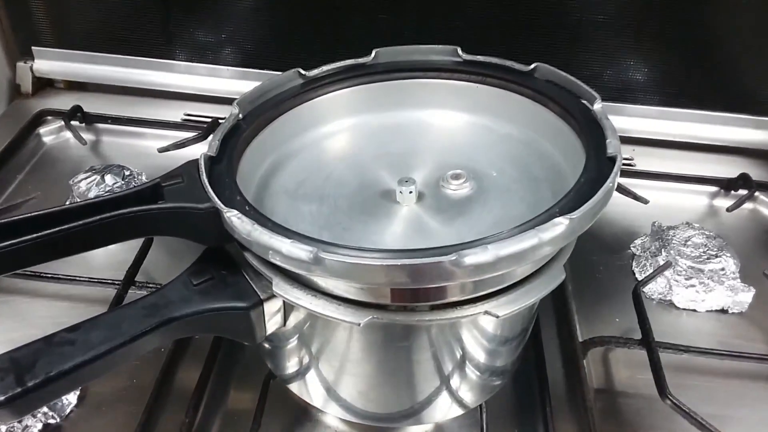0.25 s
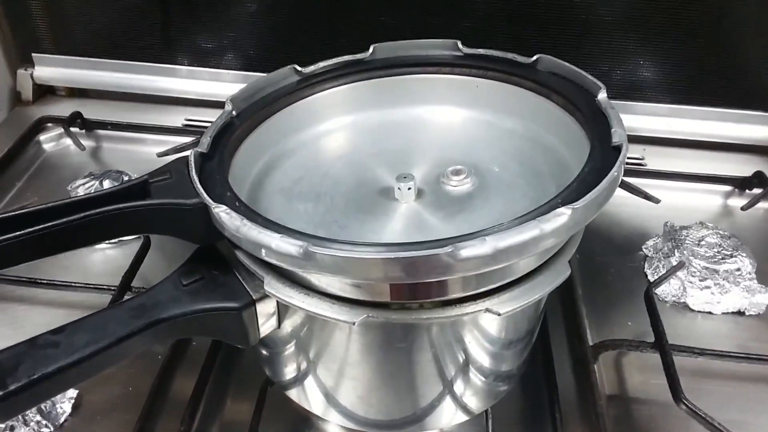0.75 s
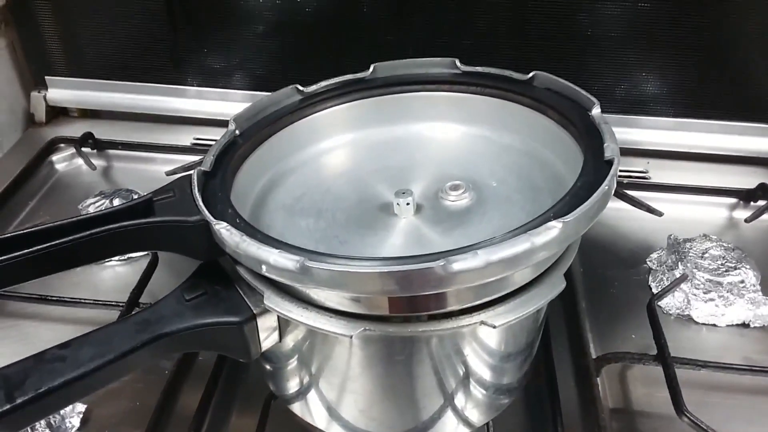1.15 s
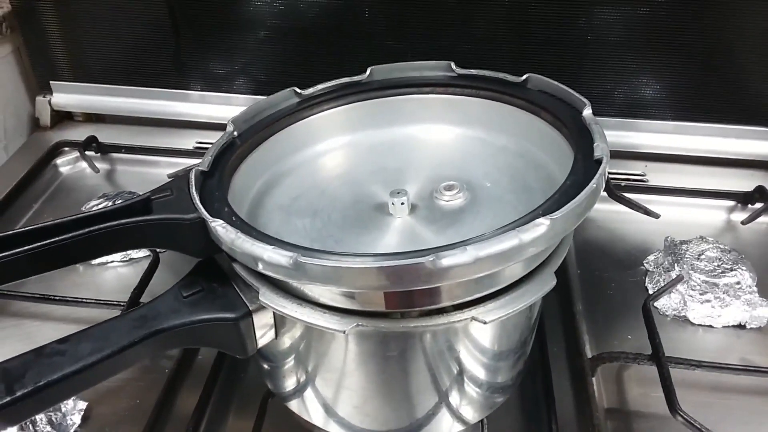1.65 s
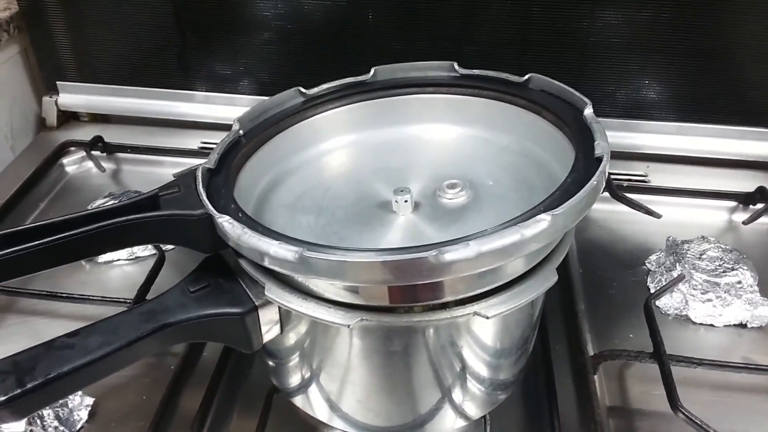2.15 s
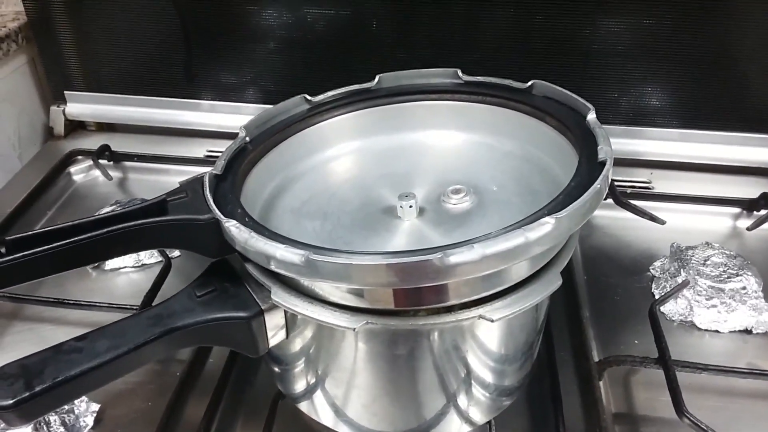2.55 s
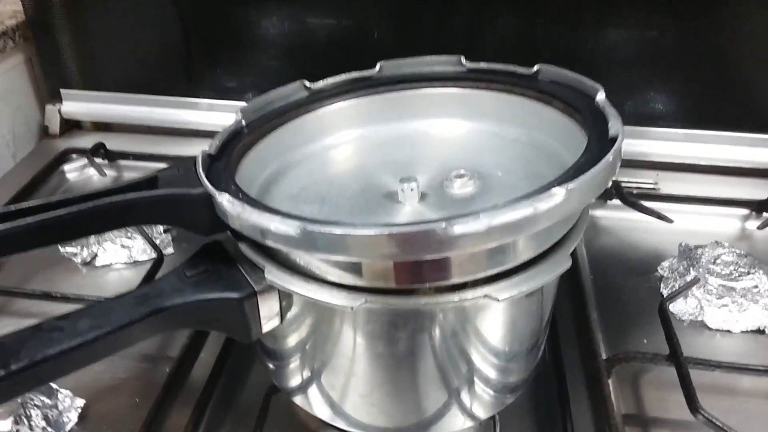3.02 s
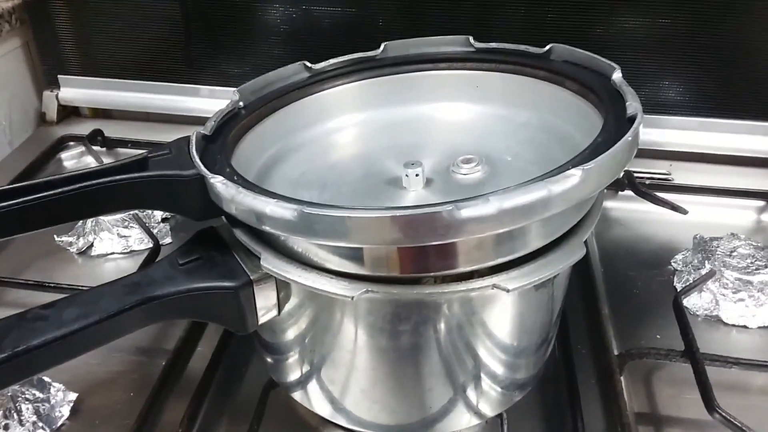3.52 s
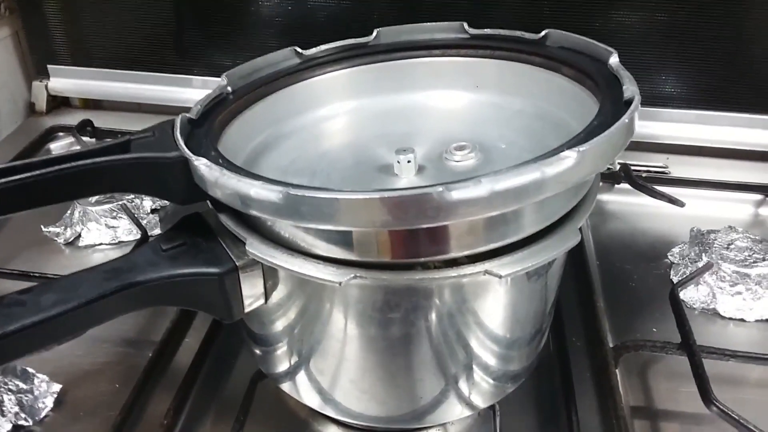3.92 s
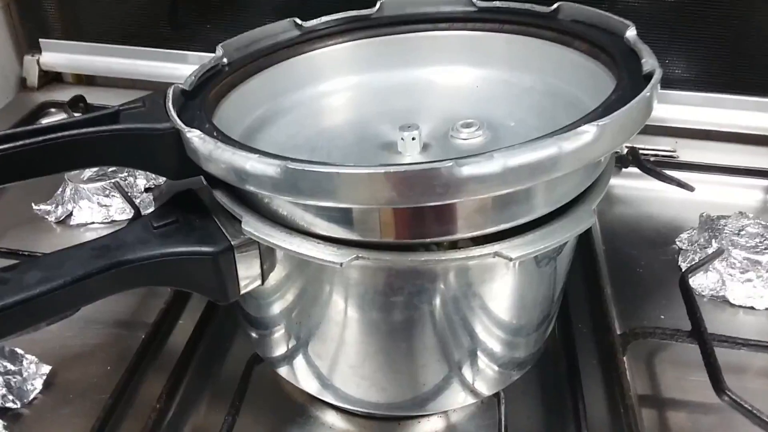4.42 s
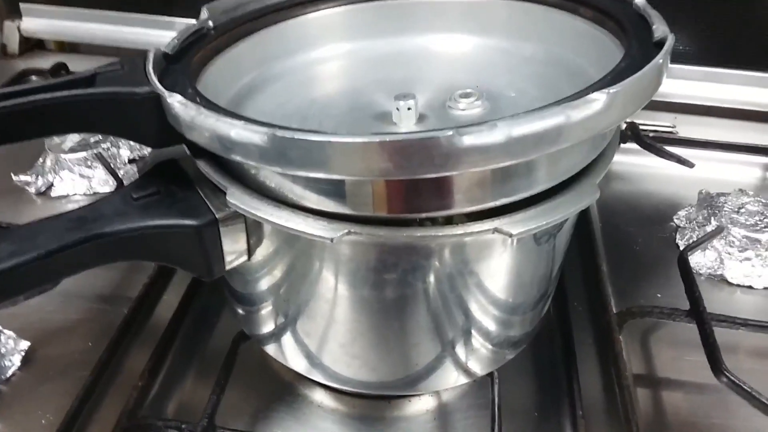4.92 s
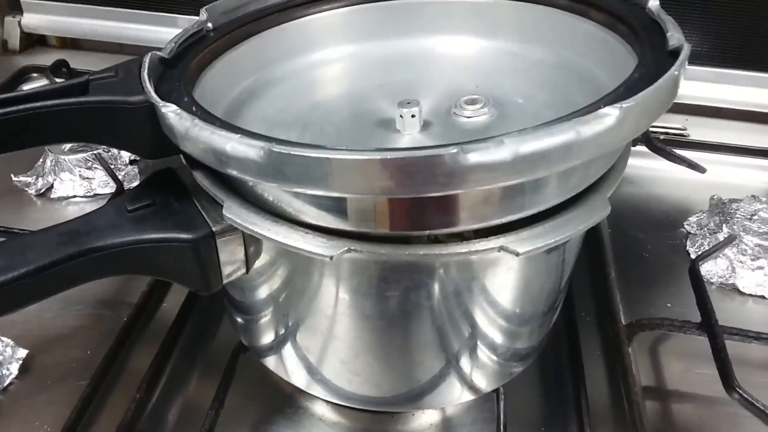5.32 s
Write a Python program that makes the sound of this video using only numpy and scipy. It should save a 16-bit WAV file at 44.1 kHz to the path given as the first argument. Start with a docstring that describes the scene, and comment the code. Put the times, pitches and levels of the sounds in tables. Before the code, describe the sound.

A small close microphone hears kernels bursting in a metal pot: a boomy thump of enclosed air, a clanky lid or rim and a bright spit each time. Early bursts are scattered, with quiet gaps around one second; stronger ones follow, with small rattles and sharp droplet snaps, ending in a dense flurry. Quiet gas burner rumble and wavering sizzle run throughout, with a short kitchen echo.

```python
"""Popcorn bursts in a lidded metal pot over a gas flame, heard from close by in a small kitchen.
The burner's low roar and the oil's hiss run throughout; from the start, bursting hulls thump the air in the pot,
knock the lid, ring base, rim and wall and spit steam. Loose kernels soon tumble and flying ones strike bare metal;
later, droplets snap on it, and the blows crowd together towards the end.
Modes ring as decaying sines, spits and hisses are coloured noise; hard walls give blows and snaps a short tail."""
import sys
import numpy as np
from scipy import signal
from scipy.fft import rfft, irfft, next_fast_len
from scipy.io import wavfile
from scipy.ndimage import map_coordinates

SR = 44100
rng = np.random.default_rng(int(sys.argv[2]) if len(sys.argv) > 2 else 0)


def to_wav(sig):
    """Store sig (one row per channel, or 1-D mono) as 16-bit WAV at the path in sys.argv[1].

    Samples outside -1..1 are clipped; the rate is SR.
    """
    pcm = np.clip(np.atleast_2d(sig), -1, 1) * 32767
    pcm = np.round(pcm).astype(np.int16)
    wavfile.write(sys.argv[1], SR, pcm.T)  # frames by channels


N = 245456  # length in samples

# relative colour of spitting steam and droplets: pitch_hz [Hz], density_db [dB per Hz]
SPIT_COLOUR = [(120, -120), (300, -31.5), (900, -19.5), (2500, -1.5), (5000, -0.5), (6500, -1), (8000, 6.5),
               (9500, -3), (13000, -6.5), (16000, -18.5)]


def amp(db):
    """Gain of a level in dB."""
    return 10 ** (np.asarray(db) / 20)


def unit(x):
    """x scaled to rms 1."""
    return x / np.sqrt(np.mean(x ** 2) + 1e-20)


def along(points, hz):
    """Read a curve of (Hz, value) points on a log frequency axis."""
    f, value = np.transpose(points)
    return np.interp(np.log(hz + 1), np.log(f + 1), value)


def wobble(rate):
    """A smooth random curve with rate knots a second."""
    knots = rng.standard_normal(int(N * rate / SR) + 4)
    return map_coordinates(knots, [np.arange(N) * rate / SR])


def hiss(colour, size, tilt_db=0):
    """Turbulent noise of rms 1 with the given colour, its highs tilted by about tilt_db an octave."""
    hz = np.fft.rfftfreq(size, 1 / SR)
    tilt = tilt_db * np.log2(hz / 6000 + 0.24)  # the offset levels the tilt out in the bass
    spectrum = rfft(rng.standard_normal(size)) * amp(along(colour, hz) + tilt)
    return unit(irfft(spectrum, size))


def add_at(out, start_s, sound):
    """Mix a sound into out from its start time."""
    start = round(start_s * SR)
    out[start:start + len(sound)] += sound


def pops():
    """Bursts thump and spit into a damped pot; strikes by flying kernels ring it longer."""
    # hulls bursting in the oil: start_s [s], thump_db, lid_db, rim_db, spit_db [dB],
    # spit_tilt_db [dB/octave]
    hull_bursts = [(0.0211, -40, -37, -40, -34, -5.5), (0.129, -59, -74, -66, -51.5, 8),
                   (0.4947, -54, -38, -43, -28, -5), (0.499, -43, -28.5, -33, -17.5, 11),
                   (0.5278, -30.5, -29, -33, -28, -7), (0.5604, -44, -35, -41, -29.5, -2),
                   (0.6962, -45, -53, -61, -59, 8), (0.7835, -32.5, -28, -37, -39, 7),
                   (0.7882, -60, -25, -35.5, -23, 2), (0.7918, -47, -33, -33, -18, 2.5),
                   (0.8187, -52, -53, -39, -31.5, 0), (1.1952, -41, -36.5, -43.5, -40.5, -23),
                   (1.263, -46, -43, -46, -39.5, -3), (1.3226, -52, -46, -46, -36.5, 5.5),
                   (1.5333, -33.5, -36.5, -45, -37.5, 5), (1.7647, -35, -30.5, -31.5, -21.5, -7.5),
                   (1.8531, -25, -33.5, -49, -21, 4.5), (2.3844, -26, -33, -35, -31, 5),
                   (2.388, -41, -30.5, -32.5, -18, 6.5), (2.6519, -41, -45, -53, -62, -4),
                   (2.6807, -49, -48, -51, -34, 4), (2.6895, -29, -33.5, -34, -23, -6),
                   (3.03, -48, -64, -48, -34.5, 15), (3.0389, -44, -56, -54, -36, -3.5),
                   (3.1222, -24.5, -34.5, -36.5, -22, 3), (3.3614, -55, -66, -61, -48.5, 11),
                   (3.575, -48, -46, -40.5, -37.5, -10.5), (3.6908, -39.5, -39, -44, -28, -4),
                   (3.842, -37, -30.5, -27, -22.5, -0.5), (3.8731, -56, -43, -38, -27.5, 6.5),
                   (3.8772, -25.5, -29, -29.5, -21, -6.5), (3.99, -18.5, -30, -36.5, -24.5, 2.5),
                   (4.3236, -45, -62, -66, -54.5, -8), (4.5571, -25.5, -30.5, -29, -22, 1),
                   (4.6526, -30.5, -25, -30, -36, 6), (4.8943, -39.5, -38.5, -41, -37, 9),
                   (4.9074, -35, -28, -35, -21, -0.5), (4.9827, -42, -51, -58, -83, -2),
                   (5.0518, -47, -40.5, -46, -42.5, 6), (5.1901, -33, -23, -27, -23.5, -9.5),
                   (5.2021, -28.5, -23.5, -26.5, -24, 0), (5.232, -30.5, -25.5, -31, -33.5, 16),
                   (5.301, -60, -40, -57, -36.5, 1), (5.3407, -24.5, -26.5, -28, -15.5, 3),
                   (5.439, -31.5, -43, -47, -30, 0)]
    # flying kernels striking bare metal: start_s [s], lid_db, base_db, rim_db, wall_db [dB],
    # wall_tilt_db [dB/octave], spit_db [dB]
    kernel_strikes = [(0.5045, -38, -54, -30, -35.5, 15, -43), (0.5424, -66, -40.5, -33, -34, 14, -32),
                      (1.1681, -56.5, -69, -52.5, -59, -18, -72), (1.5655, -38, -45, -49, -58, 7, -35),
                      (1.5812, -45, -33, -26, -30, 0, -41), (1.8829, -56, -31, -24, -22, -11, -35),
                      (1.9686, -53, -44, -35, -35.5, 6, -38), (1.9939, -45, -49, -40, -42, 2, -60),
                      (2.717, -63, -49, -33.5, -39.5, 12, -44), (3.0178, -64, -62, -49, -51, 2, -43),
                      (3.1578, -37, -34, -32, -51, -8, -33), (3.675, -60, -57, -47, -48.5, -4, -56),
                      (3.9197, -45, -36.5, -61, -58, 0, -63), (4.0386, -51, -45, -38.5, -39, -5, -33),
                      (4.246, -56, -61, -58, -60, -14, -74), (4.603, -47, -26.5, -24.5, -33.5, -1, -39),
                      (4.9224, -45, -55, -33.5, -49, -14, -52), (4.9455, -35, -35, -39, -44, -17, -43),
                      (5.3632, -38, -34.5, -29, -36, -17, -30.5), (5.4687, -58, -56, -44, -33, -19, -27.5),
                      (5.4899, -42, -44, -33.5, -33, 15, -31)]
    out = np.zeros(N + SR)
    t = np.arange(12288) / SR
    for start_s, thump_db, lid_db, rim_db, spit_db, spit_tilt_db in hull_bursts:
        base_db, wall_db = rim_db - 17.5, rim_db - 8.5
        add_at(out, start_s, blow(t, thump_db, lid_db, base_db, rim_db, wall_db, spit_db,
                                  wall_tilt_db=-3.5, spit_tilt_db=spit_tilt_db,
                                  spray_t60_s=0.067, sustain=0.54))
    for start_s, lid_db, base_db, rim_db, wall_db, wall_tilt_db, spit_db in kernel_strikes:
        thump_db = lid_db - 3.5
        add_at(out, start_s, blow(t, thump_db, lid_db, base_db, rim_db, wall_db, spit_db,
                                  wall_tilt_db=wall_tilt_db, spit_tilt_db=-1.5,
                                  spray_t60_s=0.093, sustain=0.71))
    return out[:N]


def blow(t, thump_db, lid_db, base_db, rim_db, wall_db, spit_db,
         wall_tilt_db, spit_tilt_db, spray_t60_s, sustain):
    """One blow excites air and metal at its own strengths; sustain scales the ring times of the metal."""
    # modes of the pot's lid, base, rim and wall: pitch_hz [Hz], relative level_db [dB],
    # t60_s [s, before sustain]
    lid_modes = [(1010, -33, 0.071), (1178.6, 19, 0.13), (1246, -7, 0.17), (1226, -49, 0.043),
                 (3375, 5.5, 0.029), (5940, 0.5, 0.075)]
    base_modes = [(888, -16.5, 0.16), (1383, -7, 0.29), (1430, -3.5, 0.073)]
    rim_modes = [(1947, -12, 0.28), (2000.4, 5, 0.14), (2021, 5.5, 0.098), (2280, -2, 0.14),
                 (2610, -15, 0.092), (2714, -9.5, 0.19)]
    wall_modes = [(2858, 1, 0.14), (3220, -11, 0.21), (3900, 7.5, 0.069), (4087, -9.5, 0.15),
                  (4410, -10.5, 0.23), (4710, -20.5, 0.59), (5570, -1.5, 0.057), (6480, -14.5, 0.41),
                  (7950, -6, 0.067)]
    metal_and_spit = amp(spit_db) * spit(t, spit_tilt_db, spray_t60_s)
    metal_and_spit += amp(lid_db) * ring(lid_modes, t, attack_s=0.00051, split=0.016,
                                         sustain=1.45 * sustain, early_db=17, early_share=0.35)
    metal_and_spit += amp(base_db) * ring(base_modes, t, attack_s=0.00051, split=0.003, sustain=sustain)
    metal_and_spit += amp(rim_db) * ring(rim_modes, t, attack_s=0.00054, split=0.0077, sustain=sustain)
    metal_and_spit += amp(wall_db) * ring(wall_modes, t, attack_s=0.00015, split=0.007,
                                          sustain=sustain, tilt_db=wall_tilt_db)
    air = amp(thump_db) * thump(t)
    tail = kitchen(amp(-5.0) * metal_and_spit + amp(-9.5) * air)
    return metal_and_spit + air + tail


def thump(t):
    """The air in the pot booms on its modes, with one short puff of pressure that lifts the lid."""
    # modes of the air in the pot: pitch_hz [Hz], relative level_db [dB], t60_s [s]
    air_modes = [(122.5, -8, 0.24), (249.3, 6, 0.083), (269, 4, 0.13), (288, -42, 0.11), (448, -5.5, 0.044)]
    boom = ring(air_modes, t, attack_s=0.0076, split=0.034, early_db=11, early_share=0.42)
    u = t / 0.0017  # time in puff lengths of 1.7 ms
    puff = u * (2 - u) * np.exp(1 - u)
    return boom + amp(-17.5) * puff


def spit(t, tilt_db, spray_t60_s):
    """A sharp crack, then steam and droplets that land unevenly."""
    steps_db = 3.53 * np.repeat(rng.standard_normal(len(t) // 64), 64)
    crack = amp(-2.5 - 60 * t / 0.0057)
    spray = amp(-0.03 - 60 * t / spray_t60_s)
    onset = 1 - np.exp(-t / 0.00061)
    return (crack + spray) * amp(steps_db) * onset * hiss(SPIT_COLOUR, len(t), tilt_db)


def ring(modes, t, attack_s, split, sustain=1, tilt_db=0, early_db=6, early_share=0.45):
    """One blow on a set of modes, rms 1 over its first 20 ms; a harder contact favours the upper ones."""
    hz, level_db, t60_s = np.repeat(np.transpose(modes), 3, axis=1)[:, :, None]
    # three close, randomly detuned partners make each mode beat roughly
    hz = hz * (1 + split * rng.standard_normal(hz.shape))
    level_db = level_db + tilt_db * np.log2(hz / hz[0])
    level_db = level_db + 2.5 * rng.standard_normal(hz.shape)  # random level spread of each partial
    t60_s = t60_s * sustain
    # each partial starts at a slightly random phase
    shift_s = 0.0002946 * rng.standard_normal(hz.shape)
    # each ring falls fast at first, then more slowly
    early = amp(early_db - 60 * t / (early_share * t60_s))
    late = amp(-60 * t / t60_s)
    swings = amp(level_db) * (early + late) * np.sin(2 * np.pi * hz * (t + shift_s))
    x = np.sum(swings, axis=0) * (1 - np.exp(-t / attack_s))
    return x / np.sqrt(np.mean(x[:SR // 50] ** 2))


def kitchen(x):
    """The walls' answer to one sound: a noise tail in which each frequency dies at its own speed."""
    # decay of the room: pitch_hz [Hz], t60_s [s]
    room_decay = [(150, 0.48), (700, 0.17), (2000, 0.38), (5000, 0.29), (13000, 0.24)]
    hz, t, z = signal.stft(rng.standard_normal(len(x)), SR, nperseg=256)
    fade = amp(-60 * t / along(room_decay, hz)[:, None])
    tail = signal.istft(z * fade, SR, nperseg=256)[1]
    delayed = np.pad(x, (130, 0))  # about 3 ms to the walls and back
    return signal.fftconvolve(delayed, tail / np.linalg.norm(tail))[:len(x)]


def snaps():
    """Droplets snap on hot metal: each is a very short spit of noise with the walls' answer."""
    # droplets: start_s [s], level_db [dB at the onset, before the walls' answer], tilt_db [dB/octave]
    droplets = [(1.1049, -46, 14), (1.2136, -39, 11), (2.7183, -16.5, 12), (3.477, -46, 13),
                (3.5513, -49, 8), (3.8554, -19, 5), (4.5714, -29, 8), (4.726, -41, 4), (4.9174, -17.5, 11),
                (4.9568, -24, 13), (5.249, -26, 12), (5.4444, -23, 10)]
    out = np.zeros(N + SR)
    t = np.arange(8192) / SR
    for start_s, level_db, tilt_db in droplets:
        snap = amp(level_db - 60 * t / 0.011) * hiss(SPIT_COLOUR, len(t), tilt_db)  # t60 of 11 ms
        add_at(out, start_s, snap + kitchen(amp(-6.5) * snap))
    return out[:N]


def tumbles(knocks_per_s=450):
    """Loose kernels tumble on the heap: runs of soft little knocks, some cycles long, at scattered pitch."""
    # runs: start_s [s], length_s [s], level_db [dB, before the spread of the knocks],
    # pitch_hz [Hz, centre of the scatter]
    kernel_runs = [(0.222, 0.062, -46.5, 2200), (1.16, 0.033, -54, 1480), (3.897, 0.048, -43, 900),
                   (4.242, 0.053, -43, 1600), (4.318, 0.043, -45, 1290), (4.603, 0.051, -54, 900),
                   (4.919, 0.074, -38, 535)]
    out = np.zeros(N + SR)
    t = np.arange(4096) / SR
    for start_s, length_s, level_db, pitch_hz in kernel_runs:
        count = round(knocks_per_s * length_s) + 1
        for when, pitch, size in rng.random((count, 3)):
            cycles = t * pitch_hz * np.exp(0.7 * (pitch - 0.5))
            fade = amp(level_db - 4 + 3.3 * size - 60 * cycles / 30)  # down 60 dB in 30 cycles
            onset = 1 - np.exp(-cycles / 0.37)
            knock = fade * onset * np.sin(2 * np.pi * cycles)
            add_at(out, start_s + length_s * when, knock)
    return out[:N]


def oil():
    """The oil's hiss is coloured noise that swells and sinks, with a fast flicker on top."""
    # sizzle over time: time_s [s], level_db [dB, before the flicker]
    oil_levels = [(0, -47), (.1, -69), (.7, -62), (1.24, -56), (1.4, -69), (2.6, -75), (2.73, -43),
                  (2.88, -46.5), (3.04, -59), (3.25, -47.5), (3.4, -60), (4.25, -65), (4.36, -54.5),
                  (4.55, -76), (4.74, -48), (4.84, -54.5), (5.02, -45), (5.15, -54.5), (5.42, -41),
                  (5.57, -61)]
    # relative colour of the sizzle: pitch_hz [Hz], density_db [dB per Hz]
    sizzle_colour = [(1470, -12), (2500, 4.5), (2810, -1), (3060, -4), (5070, -7.5), (5520, -7),
                     (7470, -2.5), (12800, -5), (16000, -1)]
    level_db = np.interp(np.arange(N) / SR, *np.transpose(oil_levels)) + 1.5 * wobble(100)
    return amp(level_db) * hiss(sizzle_colour, next_fast_len(N))[:N]


def burner():
    """The gas flame rumbles and flutters as low noise of drifting level; its jets hiss steadily."""
    # burner over time: time_s [s], rumble_db, flame_db [dB, before the flutter]
    burner_levels = [(0, -48.5, -47), (1.4, -54, -47), (2.8, -49.5, -47.5), (4.1, -55, -47.5),
                     (4.9, -45.5, -46.5), (5.57, -55, -47)]
    # relative colours of rumble, flame and gas jets: pitch_hz [Hz], density_db [dB per Hz]
    rumble_colour = [(20, -34), (40, -45), (70, -13.5), (105, -17.5), (126, -1), (150, -20), (220, -50)]
    flame_colour = [(88, -20.5), (150, -3), (211, -5), (260, 0), (298, -2.5), (347, -4.5), (420, -14),
                    (456, -8.5), (847, -10.5), (1100, -15), (1450, -20), (1570, -20.5), (4000, -40.5),
                    (5200, -75), (8800, -120)]
    gas_colour = [(4000, 3), (6800, -12), (7500, 11), (8300, 10), (9300, 2), (15000, -3.5)]
    time_s, rumble_db, flame_db = np.transpose(burner_levels)
    t, size = np.arange(N) / SR, next_fast_len(N)
    rumble_gain = amp(np.interp(t, time_s, rumble_db) + 2.2 * wobble(8))
    flame_gain = amp(np.interp(t, time_s, flame_db) + 2.25 * wobble(15))
    rumble = rumble_gain * hiss(rumble_colour, size)[:N]
    flame = flame_gain * hiss(flame_colour, size)[:N]
    jets = amp(-66.5) * hiss(gas_colour, size)[:N]
    return rumble + flame + jets


def scene():
    """Pot and stove at one microphone."""
    return (pops() + snaps() + tumbles() + oil() + burner())[None]


def record(dry):
    """The small microphone drops the deep bass; nothing passes above the band limit."""
    mic_hz, top_hz = 52.3, 15850
    size = next_fast_len(N + SR // 4)
    hz = np.fft.rfftfreq(size, 1 / SR)
    jf = 1j * hz / mic_hz
    bass_cut = (jf / (1 + jf)) ** 2
    return irfft(rfft(dry, size) * bass_cut * (hz < top_hz), size)[:, :N]


dry = scene()
out = record(dry)
to_wav(out)
```